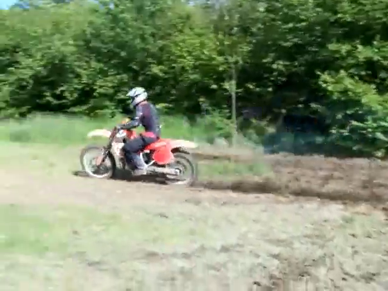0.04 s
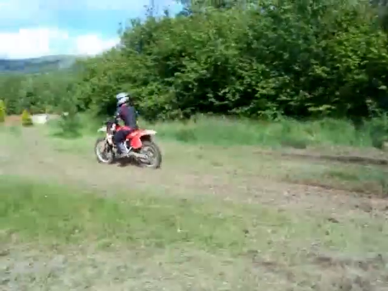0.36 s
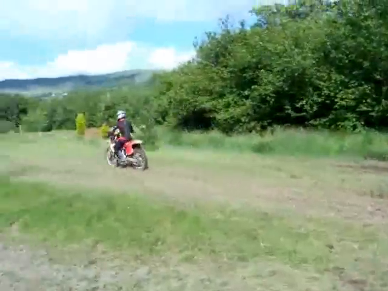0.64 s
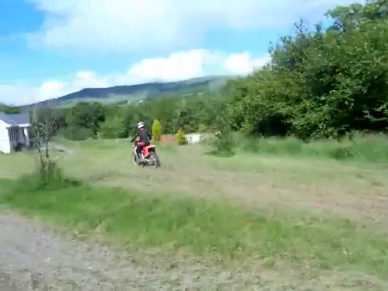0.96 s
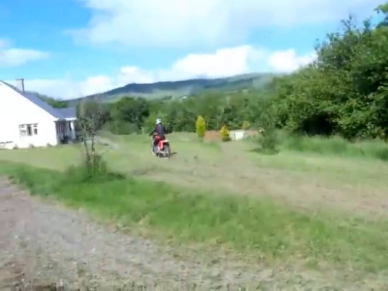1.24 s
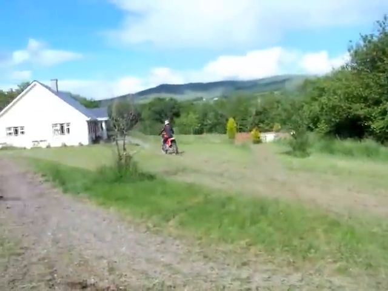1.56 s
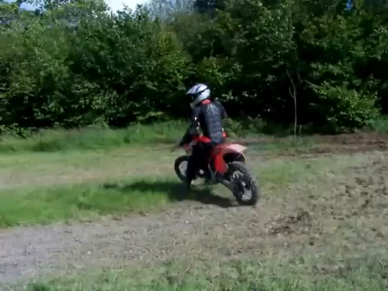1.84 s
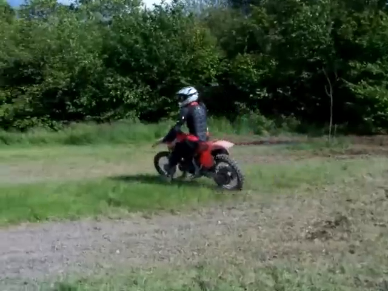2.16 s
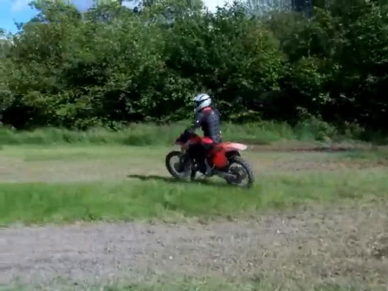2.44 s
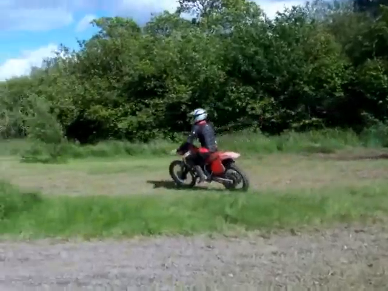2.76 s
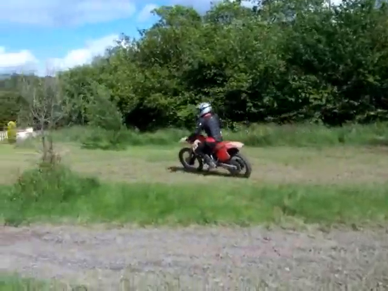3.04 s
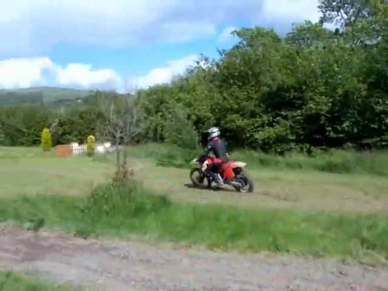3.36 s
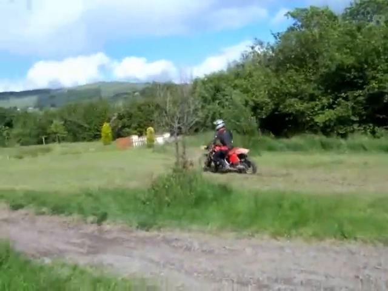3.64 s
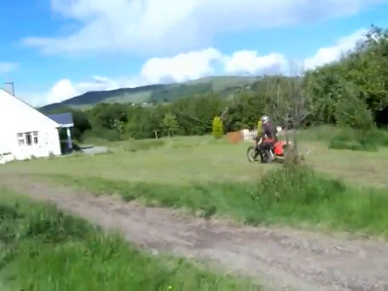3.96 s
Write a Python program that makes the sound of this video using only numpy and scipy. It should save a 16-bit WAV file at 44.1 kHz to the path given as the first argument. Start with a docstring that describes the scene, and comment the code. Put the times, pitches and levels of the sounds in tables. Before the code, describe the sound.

A two-stroke dirt bike rides away, then idles nearby and revs up harshly.

```python
"""A two-stroke dirt bike rides away over a field, revs sinking; after a brief silent gap it is near
again, stutters at idle, revs up and gives a harsh burst. Each stroke rings the exhaust pipe's modes
and lets out a puff of rasping gas, which sizzles in the thin metal. Trees return a faint echo.
Wind rumbles on the small stereo microphone, which overloads on the loudest peaks."""
import sys
import numpy as np
from scipy import signal
from scipy.fft import rfft, irfft
from scipy.io import wavfile
from scipy.ndimage import uniform_filter1d

SR = 44100
rng = np.random.default_rng(int(sys.argv[2]) if len(sys.argv) > 2 else 0)


def digitize_waveform(pressure):
    """Quantize a signal to 16-bit integers and store it at the path in sys.argv[1].

    Rows of a 2-D input are taken as channels; values are limited to [-1, 1].
    """
    field = np.atleast_2d(pressure).T
    bounded = np.clip(field, -1, 1)
    quanta = np.round(bounded * 32767).astype(np.int16)
    wavfile.write(sys.argv[1], SR, quanta)


N = 176400
TIME = np.arange(N) / SR
MISFIRE_DB = -6.5


def engine(port_open_s=2.182, jitter_s=1e-5, harsh_jitter_s=5e-5):
    """The exhaust port opens once a turn, less evenly when harsh; misfires only pump air."""
    # time_s, stroke_hz
    speed_launch = [(0.0, 169.6), (0.086, 161.6), (0.28, 156.4), (0.332, 139.7), (0.46, 117.5)]
    speed_away = [(0.52, 111.3), (0.624, 106.1), (0.748, 105.0), (0.808, 102.3), (0.98, 92.1),
                  (1.262, 75.2), (1.35, 69.4), (1.626, 60.4), (1.96, 47.5)]
    speed_near = [(2.03, 50.84), (2.094, 45.45), (2.156, 40.36), (2.216, 36.43), (2.292, 38.45),
                  (2.352, 42.86), (2.436, 45.5), (2.644, 50.23), (2.78, 52.08), (2.874, 52.18),
                  (3.066, 55.46), (3.138, 61.2), (3.33, 68.53), (3.4, 74.1), (3.472, 77.1), (3.636, 87),
                  (3.742, 105.9), (3.85, 110.7), (3.916, 105.7), (4.0, 83.2)]
    # time_s, harshness (0 mellow, 1 harsh)
    harshness = [(0, 0.87), (.28, 0.48), (.34, 0.82), (1.7, 1), (1.96, 0.24), (2.03, 0.019), (3.65, 0.094),
                 (3.7, 0.8), (4, 0.67)]
    # time_s
    misfires_s = [2.108, 2.157, 2.209]
    stroke_hz, harsh = curves([*speed_launch, *speed_away, *speed_near]) + curves(harshness)
    turns = np.cumsum(stroke_hz) / SR
    strokes = np.flatnonzero(np.diff(np.floor(turns - turns[int(port_open_s * SR)])))  # sample indices
    slip_s = (jitter_s + harsh_jitter_s * harsh[strokes]) * rng.standard_normal(len(strokes))
    strokes = np.clip(strokes + (slip_s * SR).astype(int), 0, N - 1)
    missed = np.zeros(len(strokes))
    missed[[np.argmin(np.abs(strokes / SR - s)) for s in misfires_s]] = 1
    return strokes, missed, harsh, stroke_hz


def exhaust_note(strokes, missed, harsh, stroke_hz):
    """Strokes ring four pipe registers and thump; misfires boom more and excite the rest less."""
    # pipe modes: base_hz, decay_s, relative_db
    boom_modes = [(67, 0.003, -19), (162, 0.0055, 3), (230.9, 0.01, 4), (345, 0.0074, -8.5)]
    bark_modes = [(424.9, 0.0093, 1), (512.5, 0.0047, 4.5), (651, 0.0043, -4.5)]
    honk_modes = [(342, 0.0019, -1.5), (607, 0.0061, -8), (763, 0.0046, 2.5), (911, .0035, 2.5),
                  (1340, 0.0022, -5)]
    ring_modes = [(1081, 0.0069, 9.5), (1190, 0.004, 4.5), (1340, 0.001, -18)]
    # register levels before trim: time_s, boom_db, bark_db, ring_db
    levels_away = [(0.0, -13.5, -20, -14), (0.282, -12.5, -21.5, -19), (0.354, -22, -31.5, -9.5),
                   (0.758, -20.5, -18.5, -12), (1.096, -33.5, -23.5, -38), (1.17, -40, -31.5, -36),
                   (1.528, -29.5, -30.5, -30), (1.7, -30.5, -34.5, -44), (1.96, -42, -40.5, -53)]
    levels_near = [(2.03, -28, -26, -29), (2.094, -23, -25, -26), (2.2, -22.5, -31, -29),
                   (2.392, -23.5, -25, -28), (2.714, -23.5, -26.5, -22.5), (3.05, -22, -23.5, -21),
                   (3.132, -15, -26, -25.5), (3.33, -20, -25, -29.5), (3.406, -18, -30, -22),
                   (3.55, -14, -34, -32), (3.642, -22, -34, -29), (3.714, -24, -28.5, -13),
                   (3.834, -18.5, -19.5, -13), (4.0, -39, -62, -29)]
    # honk opens with the throttle: time_s, level_db
    honk_level = [(0, -24), (1.1, -36), (3.05, -48.5), (3.36, -30), (3.54, -22), (3.68, -24), (3.83, -24),
                  (3.95, -59)]
    # modes shift with gas heat: time_s, bark_ratio, ring_ratio
    heat_shift = [(0, 1.27, 1.01), (.28, 1.13, 0.83), (.36, 0.92, 0.96), (.6, 1.004, 1.22),
                  (1.12, 0.99, 0.86), (1.95, 1, 0.89), (2.05, 1, 1.07), (2.45, 1.05, 0.99), (2.6, 1.02, 1),
                  (3.02, 1.034, 1.0), (3.12, 1.065, 1.09), (3.2, 1.082, 1.15), (3.42, 0.96, 1.18),
                  (3.6, 0.95, 1.3), (3.7, 1.005, 1.15), (3.85, 1.097, 1.16)]
    # boom sits lower with the throttle shut: time_s, boom_ratio
    throttle_shift = [(.28, 0.92), (.5, 0.85), (1.2, 0.74), (1.95, 0.58), (2.03, 0.82), (2.45, 0.89),
                      (3.2, 1.083), (3.42, 1.057), (3.6, 1.05)]
    boom_db, bark_db, ring_db, honk_db = curves([*levels_away, *levels_near]) + curves(honk_level)
    bark_ratio, ring_ratio, boom_ratio = [c[strokes] for c in curves(heat_shift) + curves(throttle_shift)]
    force = from_db(MISFIRE_DB * missed)
    boom = pipe(boom_modes, strokes, from_db(4 * missed), boom_ratio)
    bark = singing(pipe(bark_modes, strokes, force, bark_ratio), stroke_hz)
    honk = pipe(honk_modes, strokes, force, pitch_ratio=0.98)
    ring = pipe(ring_modes, strokes, force, ring_ratio)
    return (from_db(boom_db - 3) * delayed(boom, 0.00091)  # the slow wave trails the crack
            + thump(strokes, force, ring_ratio)
            + from_db(bark_db + 1.5) * bark
            + from_db(honk_db) * honk
            + from_db(ring_db - 12.5 * harsh) * delayed(ring, 0.00077))  # ring gives way to rasp


def pipe(modes, strokes, force, pitch_ratio, spread_db=1):
    """Each stroke makes the modes swell and die away; levelled to unit rms."""
    t = np.arange(2200) / SR
    shapes = 0
    for k, (base_hz, decay_s, relative_db) in enumerate(modes):
        pitch_hz = base_hz * np.reshape(pitch_ratio, (-1, 1))
        wave = t / decay_s * np.exp(-t / decay_s) * np.sin(2 * np.pi * pitch_hz * t)
        gain = from_db(relative_db) * force * strengths(strokes, spread_db)
        shapes = shapes - (-1) ** k * gain[:, None] * wave
    return levelled(overlap_add(strokes, shapes))


def singing(bark, stroke_hz, peak_share=0.72):
    """As the revs sink, one overtone after another takes a share of the bark's power."""
    # start_s, end_s, harmonic_number
    overtones = [(.53, 1.16, 5), (1.16, 1.6, 7), (1.66, 1.96, 9)]
    for start_s, end_s, harmonic in overtones:
        active = 1.0 * ((TIME > start_s) & (TIME < end_s))
        share = peak_share * np.clip(uniform_filter1d(active, 4500), 0, 1)
        tone = np.sin(2 * np.pi * harmonic * np.cumsum(stroke_hz) / SR)
        bark = np.sqrt(1 - share) * bark + np.sqrt(2 * share) * tone
    return levelled(bark)


def thump(strokes, force, heat_ratio, sigma_s=0.00029, base_trip_s=0.00306, lead_s=0.00036):
    """A rounded pressure pulse leaves the pipe and returns inverted, sooner in hot gas."""
    # heard only near: time_s, level_db
    level = [(1.95, -45), (2.03, -29.5), (2.7, -31), (3.3, -25.5), (3.52, -21), (3.66, -22.5), (3.75, -32)]
    t = np.arange(400) / SR - base_trip_s
    pulse = np.exp(-0.5 * (t / sigma_s) ** 2)
    reflection = np.exp(-0.5 * ((t - base_trip_s / heat_ratio[:, None]) / sigma_s) ** 2)
    pressure = overlap_add(strokes, force[:, None] * (reflection - pulse))
    radiated = filtered(pressure, 158, "high")  # the small outlet radiates little bass
    return from_db(curves(level)[0]) * delayed(levelled(radiated), -base_trip_s - lead_s)


def exhaust_rasp(strokes, missed, harsh, attack_s=0.0009, decay_s=0.001, rush_floor=0.85):
    """Each firing cracks, and turbulent gas leaves in a puff over a steady rush."""
    # time_s, gain_db
    gain_away = [(0.0, -6), (0.206, -6), (0.332, -4), (0.894, -7.5), (0.928, -11.5), (0.96, -8.5),
                 (1.096, -15), (1.14, -12), (1.2, -18), (1.222, -15.5), (1.38, -19.5), (1.414, -25.5),
                 (1.468, -19), (1.5, -25.5), (1.528, -20), (1.576, -25.5), (1.686, -23.5), (1.79, -31),
                 (1.96, -29.5)]
    gain_near = [(2.03, -17.5), (2.1, -17.5), (2.116, -21), (2.134, -17), (2.166, -21), (2.462, -18),
                 (2.994, -17), (3.142, -14.5), (3.658, -14.5), (3.698, -12), (3.884, -11), (4.0, -16)]
    # gas noise spectra: frequency_hz, relative_db
    harsh_spectrum = [(760, -61), (1300, -7), (1810, -5), (2550, -2.5), (3740, -1), (4650, -4.5),
                      (6620, -7), (7970, -16.5), (9120, -10.5), (11900, -11.5), (14100, -16.5),
                      (15500, -23)]
    mellow_bass = [(350, -32)]
    mellow_spectrum = [(760, -2.5), (1300, -2.5), (1900, -6), (2830, -2.5), (3860, -2), (5050, -7.5),
                       (7260, -10), (7970, -20.5), (9410, -10.5), (10800, -15.5), (12500, -11),
                       (14100, -26), (15500, -13)]
    churn_spectrum = [(25, -3), (60, -10.5), (130, -2), (220, 0.5), (300, -8.5), (450, 1.5), (750, -3),
                      (960, -3.5), (1250, 1), (1450, -8), (1900, -14.5)]
    # pitch_hz, decay_s, relative_db
    crack_modes = [(1590, 0.00078, -5.5), (2210, 0.00019, -4), (2500, 0.00015, -7), (3460, 0.0001, -1),
                   (5650, 0.00029, -5), (9500, 0.000028, 6.5)]
    t = np.arange(1800) / SR
    puff = (1 - np.exp(-t / attack_s)) * np.exp(-t / decay_s)
    puffs = overlap_add(strokes, strengths(strokes, spread_db=4.5)[:, None] * puff)
    misfiring = np.append(0, missed)[np.searchsorted(strokes, np.arange(N))]
    flow = levelled(rush_floor + puffs) * from_db(-2.5 * misfiring)
    harsh_rasp = np.sqrt(harsh) * from_db(3.5) * noise(harsh_spectrum, flow)
    mellow_rasp = np.sqrt(1 - harsh) * noise([*mellow_bass, *mellow_spectrum], flow)
    rasp = from_db(-1.72) * (harsh_rasp + mellow_rasp)
    force = from_db(MISFIRE_DB * missed)
    crack = from_db(-14.5) * pipe(crack_modes, strokes, force, pitch_ratio=1, spread_db=2)
    churn = from_db(-15.5 + 8.5 * harsh) * noise(churn_spectrum, flow)
    gain_db, = curves([*gain_away, *gain_near])
    return from_db(gain_db) * (rasp + crack + churn + sizzle(flow))


def sizzle(flow, wander_rms_hz=222.4, whine_hz=2135):
    """The rasp rings in the pipe's thin metal: one restless band, one whine of steady pitch."""
    # time_s, centre_hz, relative_db
    band_track = [(.25, 3226, -35), (.52, 2920, -3), (.58, 3362, -6), (.62, 2500, -4), (.73, 2717, -3),
                  (.78, 3225, -3.5), (.88, 3250, -1.5), (.98, 3208, -5.5), (1.15, 3324, -1.5),
                  (2.0, 3000, -14.5), (3.6, 3492, -16), (3.75, 4090, -4), (4, 3994, -5)]
    # time_s, relative_db
    whine_level = [(.4, -32), (.55, -14), (.97, -8.5), (1.1, -24)]
    centre_hz, band_db, whine_db = curves(band_track) + curves(whine_level)
    wander_hz = wander_rms_hz * unit_rms(filtered(rng.standard_normal(N), cutoff_hz=28))
    band = unit_rms(narrow_band(centre_hz + wander_hz, half_width_hz=320) * flow)
    whine = unit_rms(narrow_band(whine_hz, half_width_hz=33))
    return from_db(band_db) * band + from_db(whine_db) * whine


def tree_echo(x):
    """Faint reflection from the edge of the field."""
    # delay_s, left_db, right_db
    echoes = [(.058, -14, -14)]
    return sum(from_db([[left], [right]]) * delayed(x, delay_s) for delay_s, left, right in echoes)


def wind(trim_db=-2.5):
    """Wind rumbles on the microphone."""
    # frequency_hz, relative_db
    spectrum = [(15, -20), (40, 9), (80, 11), (160, -7), (400, -56)]
    # gusts: time_s, relative_db
    gusts = [(0.0, -51), (0.09, -20), (0.32, -42.5), (1.48, -40), (3.66, -50), (3.71, -35), (4.0, -56)]
    return from_db(curves(gusts)[0] + trim_db) * noise(spectrum, 1)


def noise(spectrum, envelope):
    """Enveloped, coloured stereo noise at unit rms."""
    # frequency_hz, left_right_correlation
    likeness = [(60, 0.24), (130, 0.83), (290, 0.69), (640, 0.64), (1410, 0.86), (3100, 0.62), (6820, 0.68),
                (15000, 0.93)]
    hz = np.arange(N // 2 + 1) * SR / N
    alike = at_hz(likeness, hz)
    mid, side = rfft(rng.standard_normal((2, N)) * envelope) * from_db(at_hz(spectrum, hz))
    return unit_rms(irfft(np.sqrt(1 + alike) * mid + np.sqrt(1 - alike) * side * [[1], [-1]], N))


def narrow_band(centre_hz, half_width_hz):
    """Stereo noise around a centre that may move."""
    common, left, right = filtered(rng.standard_normal((3, N, 2)) @ [1, 1j], half_width_hz)
    carrier = np.exp(2j * np.pi * np.cumsum(centre_hz * np.ones(N)) / SR)
    return ((common + 0.32 * np.array([left, right])) * carrier).real


def strengths(strokes, spread_db):
    """Random gain per stroke."""
    return from_db(spread_db * rng.standard_normal(len(strokes)))


def overlap_add(strokes, shapes):
    """Sum one short shape per stroke."""
    out = np.zeros(N + shapes.shape[1])
    for start, shape in zip(strokes, shapes):
        out[start:start + len(shape)] += shape
    return out[:N]


def levelled(x, window_samples=3000):
    """Remove slow level changes, keep the pulses."""
    power = uniform_filter1d(uniform_filter1d(x ** 2, window_samples), window_samples)
    return x / np.sqrt(np.abs(power) + 1e-9)


def curves(rows):
    """One per-sample curve for each column after time_s."""
    time_s, *columns = np.transpose(rows)
    return [np.interp(TIME, time_s, column) for column in columns]


def at_hz(points, hz):
    """Interpolate on a log-frequency axis."""
    points_hz, values = np.transpose(points)
    return np.interp(np.log(hz + 1e-6), np.log(points_hz), values)


def filtered(x, cutoff_hz, kind="low"):
    return signal.sosfilt(signal.butter(2, cutoff_hz, kind, fs=SR, output="sos"), x)


def delayed(x, delay_s):
    return np.interp(TIME - delay_s, TIME, x, left=0)


def unit_rms(x):
    return x / np.sqrt(np.mean(x ** 2) + 1e-20)


def from_db(db):
    return 10 ** (np.asarray(db) / 20)


def scene():
    """The bike, its echo and the wind."""
    strokes, missed, harsh, stroke_hz = engine()
    note = exhaust_note(strokes, missed, harsh, stroke_hz)
    rasp = exhaust_rasp(strokes, missed, harsh)
    pan_left = from_db([[1.25], [-1.25]])
    return note * pan_left + rasp + tree_echo(note) + wind()


def record(dry):
    """The scene changes across a brief silent gap; soft overload on the peaks, and a steep 15.7 kHz low-pass."""
    # end gains hold before and after the gap: time_s, gain_db
    scene_change = [(1.962, -2.5), (1.975, -14), (1.988, -48), (2.005, -40), (2.014, -8), (2.026, 3)]
    x = dry * from_db(curves(scene_change)[0])
    clipped = x / (1 + x ** 8) ** (1 / 8)
    return signal.sosfilt(signal.ellip(12, 0.1, 70, 15700, fs=SR, output="sos"), clipped)


dry = scene()
out = record(dry)
digitize_waveform(out)
```